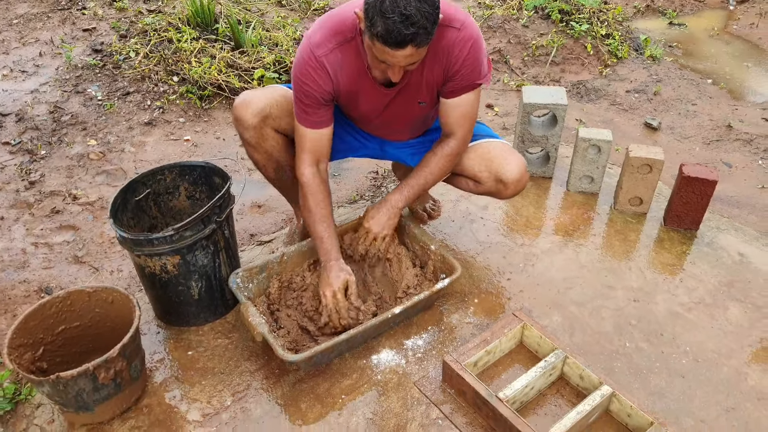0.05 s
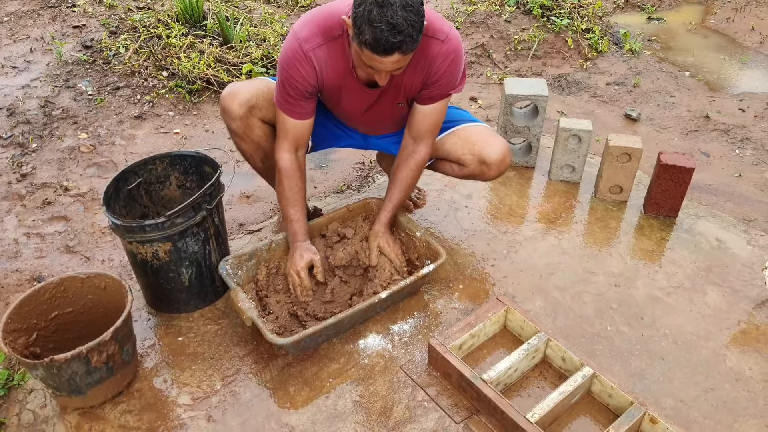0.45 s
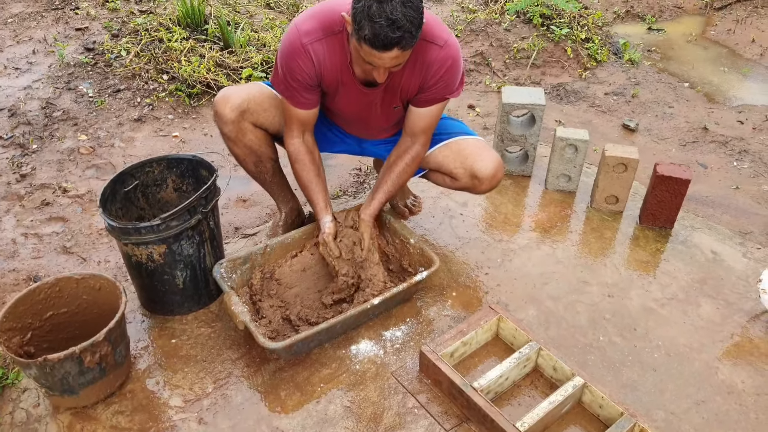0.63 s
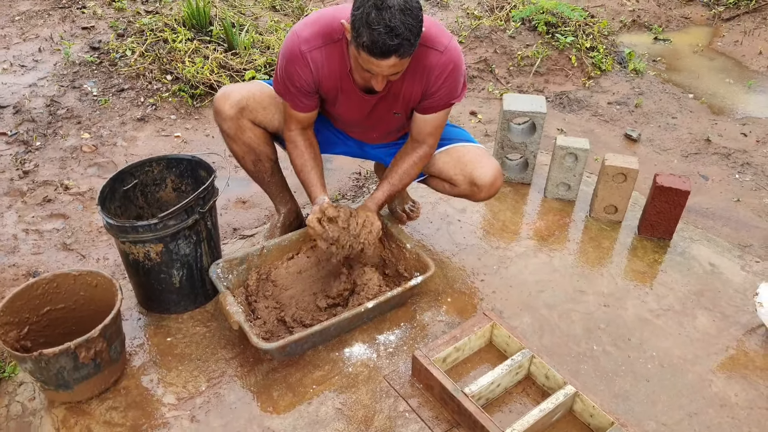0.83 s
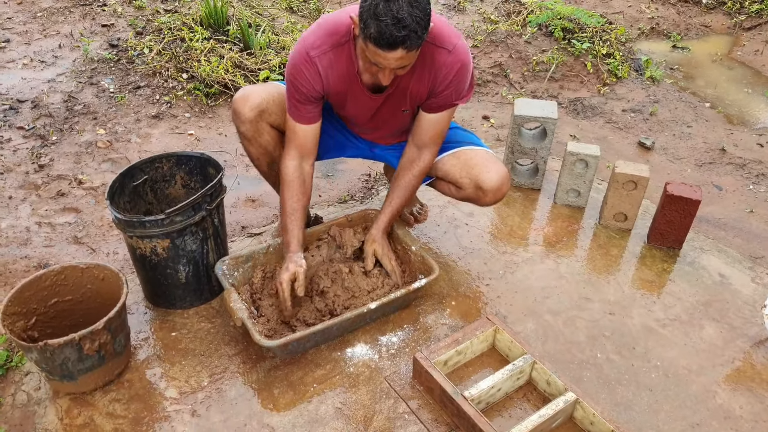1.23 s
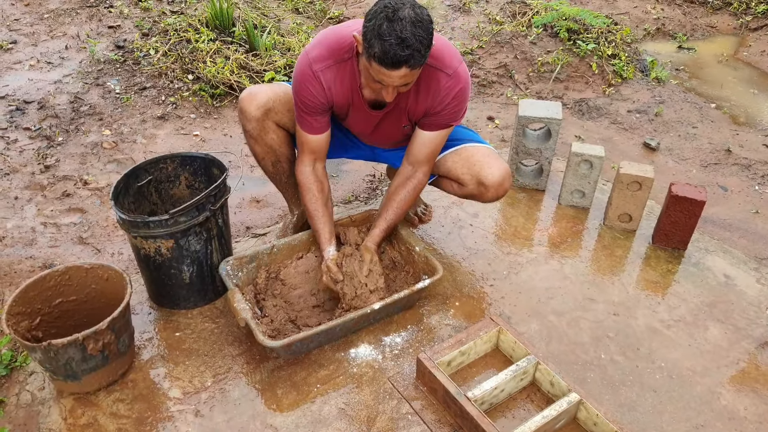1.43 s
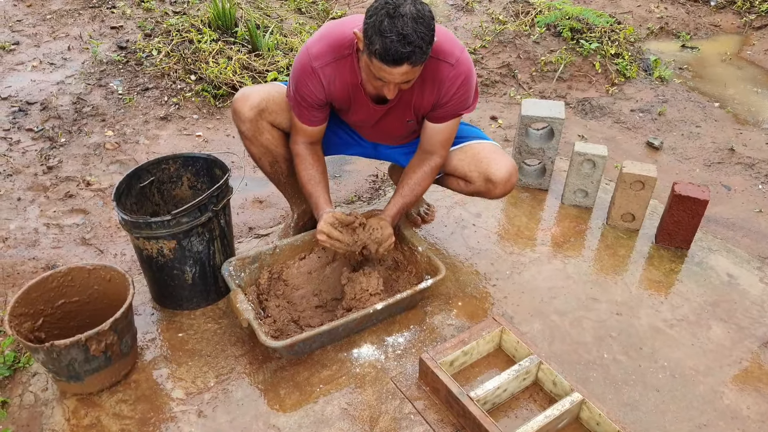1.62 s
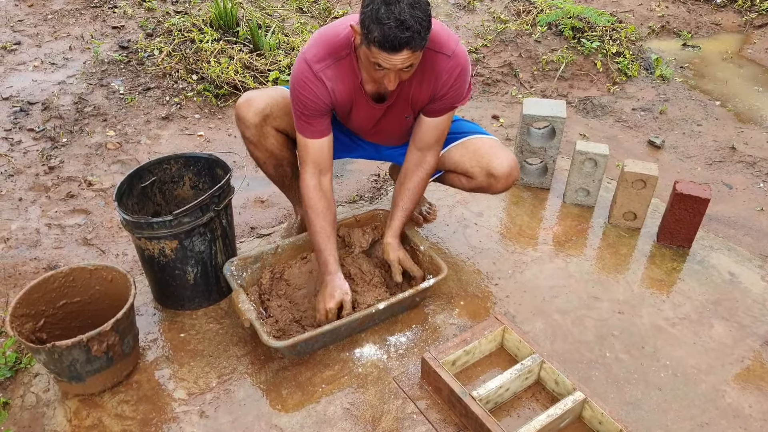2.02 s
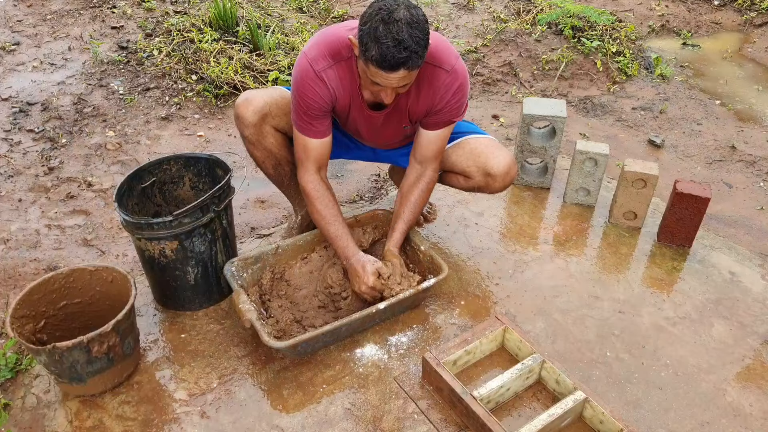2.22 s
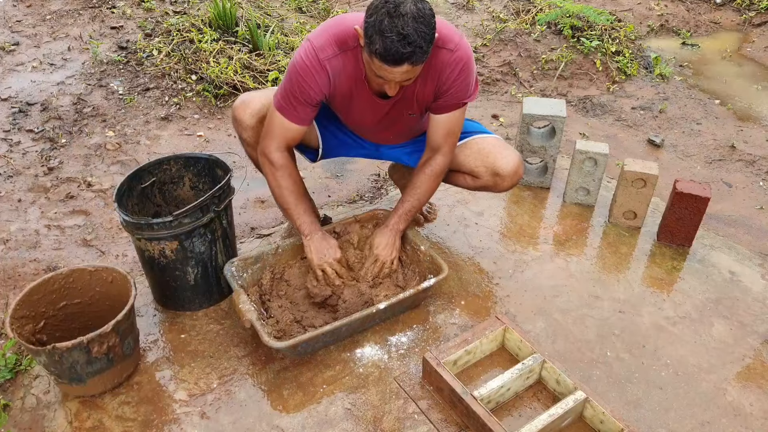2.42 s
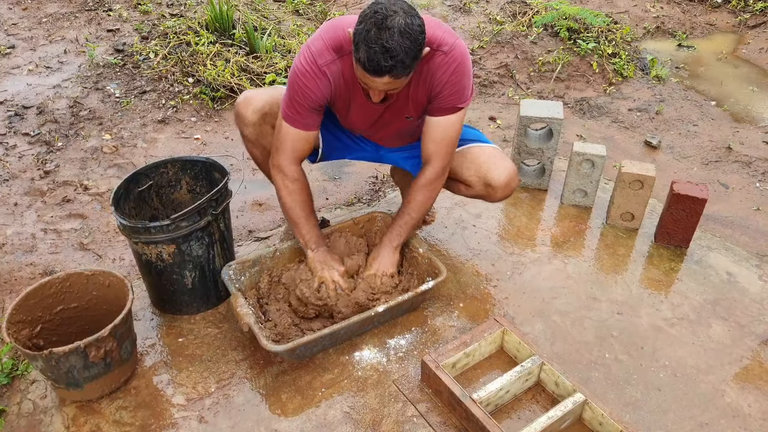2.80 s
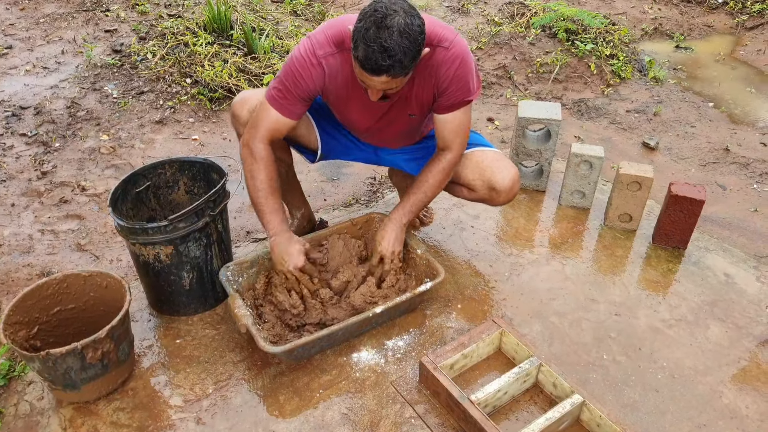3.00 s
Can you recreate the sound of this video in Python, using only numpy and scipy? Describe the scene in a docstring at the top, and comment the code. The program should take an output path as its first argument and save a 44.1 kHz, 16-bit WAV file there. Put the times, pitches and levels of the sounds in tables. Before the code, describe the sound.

Wet mud squelches as it is squeezed by hand outdoors, with one sharp slap.

```python
"""Hands knead wet clay in a plastic tub outdoors. Tiny films burst in a fizz, squeezed mud squelches in the
hollow between the fingers, trapped air spits out and wet contacts click. The clay thuds on the tub;
once a lump is slapped down and its cavity rings. Behind it, water patters steadily on wet ground,
light gusts buffet the microphone and the distance hisses faintly."""
import sys
import numpy as np
from scipy import signal
from scipy.fft import rfft, irfft, next_fast_len
from scipy.io import wavfile
from scipy.ndimage import uniform_filter1d

SR = 44100
rng = np.random.default_rng(int(sys.argv[2]) if len(sys.argv) > 2 else 0)


def bounce(signal):
    """Save signal as a 16-bit WAV file at the path given by the first command-line argument."""
    frames = np.transpose(np.atleast_2d(signal))
    limited = np.clip(frames, -1, 1)
    pcm = np.round(limited * 32767).astype(np.int16)
    wavfile.write(sys.argv[1], SR, pcm)


N = 138915

# distant hiss spectrum (frequency [Hz], gain [dB])
HISS_SPECTRUM = [(25, -34), (70, 7.5), (180, 1), (320, 10.5), (650, -1), (2800, -6), (6000, -32),
                 (16000, -24)]
# gusts (peak time [s], rise and fall width [s], relative level [dB])
GUST_EVENTS = [(0.616, 0.038, -44), (0.745, 0.089, -47.5), (0.813, 0.017, -43), (0.938, 0.027, -49),
               (1.502, 0.092, -52.5), (1.896, 0.032, -50), (2.079, 0.028, -44.5), (2.306, 0.017, -40.5),
               (2.461, 0.024, -45), (3.06, 0.035, -54)]
# buffeting spectrum (frequency [Hz], gain [dB])
GUST_SPECTRUM = [(20, -26), (35, -10), (55, 5.5), (85, 2.5), (130, -7.5), (250, -20.5), (1500, -71)]
# spectrum of splats and wet clicks (frequency [Hz], gain [dB])
WET_SPECTRUM = [(100, -14.5), (220, -13.5), (320, 7), (450, 5), (600, 1), (1500, 1.5), (2100, -2.5),
                (3600, -5), (5500, -12.5), (16000, -37)]
# slow swing of the patter (time [s], gain [dB])
PATTER_GAIN = [(0, 3), (.9, 1), (1.27, -0.5), (1.7, 1), (3.15, 2)]
# clay slapped or pressed on the tub (time [s], level [dB], decay [s])
THUD_EVENTS = [(0.219, -49, 0.046), (0.813, -43.5, 0.011), (1.095, -35.5, 0.0096), (2.3, -37, 0.0045)]
# thud spectrum (frequency [Hz], gain [dB])
THUD_SPECTRUM = [(35, -6), (85, 0.5), (200, -2), (400, -7.5), (850, -20), (5000, -64)]
# modes of the cavity under the slapped lump (frequency [Hz], level [dB])
CAVITY_MODES = [(851, -27.5), (1360, -31.5), (2380, -33), (2950, -35)]
# single wet clicks (time [s], relative level [dB], pitch [Hz])
CLICK_EVENTS = [(0.25, -30, 1640), (0.409, -30, 1460), (0.431, -31, 1600), (0.501, -28, 1280),
                (0.621, -23, 1350), (0.635, -24, 1450), (0.784, -31, 1400), (0.912, -30, 1580),
                (1.058, -25, 700), (1.204, -31.5, 1330), (1.273, -30, 1250), (1.308, -33, 1320),
                (1.396, -30, 2300), (1.457, -29, 800), (1.51, -30.5, 1390), (1.641, -30, 1140),
                (1.804, -28, 1240), (1.996, -31, 1630), (2.009, -31, 1150), (2.27, -32, 1500),
                (2.462, -28, 1310), (2.608, -28, 1790), (2.659, -29, 1520), (2.851, -22.5, 1000)]
# escaping air pockets, plus the hard crack of the lump slapped down at 1.094 s (time [s], level [dB], pitch
# [Hz], decay [s])
SPIT_EVENTS = [(.522, -37.5, 4480, .003), (.566, -39, 12300, 0.0027), (0.704, -40.5, 3130, 0.0059),
               (1.052, -40, 11000, .003), (1.084, -29, 2600, 0.0045), (1.0855, -29, 8000, 0.0018),
               (1.087, -35.5, 4700, 0.0082), (1.0941, -16, 12600, 0.00082), (1.314, -42.5, 4940, .004),
               (1.465, -36.5, 2670, 0.0034), (1.828, -37, 4500, 0.0034), (1.858, -36.5, 5000, 0.0033),
               (1.859, -34.5, 12100, 0.003), (2.252, -33, 13000, 0.0023), (2.2519, -30.5, 2900, 0.0043),
               (2.2539, -37, 5100, .002), (2.482, -31, 4640, 0.0018), (2.493, -45, 12800, 0.0035),
               (2.502, -34, 2550, 0.003), (2.557, -39, 4400, 0.0014), (2.811, -42, 12900, .004)]
# mud forced between fingers (peak time [s], rise [s], fall [s], relative level [dB], hollow pitch [Hz])
SQUELCH_EVENTS = [(.232, 0.031, 0.019, -47.5, 930), (.435, 0.0078, 0.091, -49.5, 1510),
                  (0.598, 0.011, 0.011, -38, 1430), (0.625, 0.012, 0.014, -40.5, 1360),
                  (.82, 0.019, 0.047, -51, 440), (1.063, 0.0047, 0.044, -45, 453),
                  (1.093, 0.0049, 0.0076, -39.5, 1320), (1.463, 0.0065, 0.011, -43.5, 1570),
                  (1.831, 0.015, 0.0069, -40, 820), (2.185, 0.042, 0.045, -48, 1290),
                  (2.335, 0.014, 0.019, -48, 750), (2.478, 0.018, 0.02, -42, 1250),
                  (2.609, 0.018, 0.011, -46, 1100), (2.792, 0.015, 0.015, -46, 1380),
                  (2.868, 0.016, 0.022, -45, 1520)]
# squelch crackle spectrum (frequency [Hz], gain [dB])
SQUELCH_SPECTRUM = [(150, 1), (350, 18.5), (800, 10), (1100, -7.5), (2800, -7), (3700, -4.5), (5000, -1),
                    (8000, -16), (16000, 1)]
# modes of the hollow between the fingers (pitch multiple [ratio], gain [dB])
HOLLOW_MODES = [(.58, -11), (1, -4), (1.95, -8.5)]
# fizz of sliding clay (time [s], level [dB])
FIZZ_LEVEL = [(0, -52), (.18, -48), (.24, -44.5), (.31, -51), (.39, -55.5), (0.429, -49), (.49, -53.5),
              (.56, -42), (.62, -46), (.67, -49.5), (.83, -47.5), (.88, -53), (1.01, -51.5), (1.05, -40),
              (1.07, -48), (1.096, -31), (1.12, -43.5), (1.23, -57.5), (1.41, -50), (1.475, -45.5),
              (1.51, -51), (1.79, -53), (1.83, -43.5), (1.87, -46.5), (1.91, -55), (2.05, -52.5),
              (2.16, -48.5), (2.25, -44), (2.31, -50), (2.45, -51.5), (2.475, -43.5), (2.54, -45),
              (2.6, -54), (2.745, -52.5), (2.765, -47), (2.9, -49.5), (3.15, -52)]
# fizz spectrum (frequency [Hz], gain [dB])
FIZZ_SPECTRUM = [(500, -5.5), (1500, 5), (2800, 4), (4000, 3), (8500, 3), (10000, 0), (12000, 5),
                 (14500, 1.5), (16000, 5)]
# stereo width (frequency [Hz], side gain [dB])
SIDE_GAIN = [(100, -4), (300, -12), (600, -6.5), (1300, -2), (4000, 0.5), (9000, -6.5), (13000, -10.5)]


def from_db(db):
    """Decibels to gain."""
    return 10 ** (np.asarray(db) / 20)


def unit_rms(x):
    """Scale to rms 1."""
    return x / np.sqrt(np.mean(x ** 2) + 1e-20)


def times_s():
    """Time of every sample."""
    return np.arange(N) / SR


def add(out, sound, time_s):
    """Mix in a short sound."""
    start = int(np.clip(time_s * SR, 0, N - 1))
    out[..., start:start + sound.shape[-1]] += sound[..., :N - start]


def flatten(x, window_s):
    """Hold the running rms at 1."""
    power = uniform_filter1d(x ** 2, max(int(window_s * SR), 3))
    return x / np.sqrt(np.abs(power) + 1e-12)


def bin_gains(spectrum, size):
    """FFT bin gains from (Hz, dB) points, interpolated in log frequency."""
    hz, db = np.transpose(spectrum)
    return from_db(np.interp(np.log(np.fft.rfftfreq(size, 1 / SR) + 1), np.log(hz), db))


def colour(x, spectrum):
    """Minimum-phase filter, unit power gain."""
    size = next_fast_len(N + 8192, True)
    cepstrum = irfft(np.log(unit_rms(bin_gains(spectrum, size))), size)
    cepstrum[1:size // 2] *= 2
    cepstrum[size // 2 + 1:] = 0
    return irfft(rfft(x, size) * np.exp(rfft(cepstrum)), size)[..., :N]


def resonate(x, hz, q):
    """Fixed resonance, peak gain 1."""
    w = 2 * np.pi * min(hz, .45 * SR) / SR
    damping = np.sin(w) / (2 * q)
    return signal.lfilter([damping, 0, -damping], [1 + damping, -2 * np.cos(w), 1 - damping], x + 1e-18)


def glide(x, hz, width_hz):
    """Resonance with per-sample pitch, rms 1."""
    carrier = np.exp(2j * np.pi * np.cumsum(hz) / SR)
    baseband = signal.lfilter([1], [1, -np.exp(-np.pi * width_hz / SR)], x / carrier + 1e-18)
    return unit_rms((carrier * baseband).real)


def swell(peak_s, rise_s, fall_s):
    """Asymmetric Gaussian envelope."""
    t = times_s() - peak_s
    return np.exp(-.5 * (t / np.where(t < 0, rise_s, fall_s)) ** 2)


def burst(lead_s, rise_s, decay_s):
    """Exponential rise and decay, peak at lead_s."""
    t = np.arange(SR // 8) / SR - lead_s
    return np.exp(-np.abs(t) / np.where(t < 0, rise_s, decay_s))


def grains(per_s, spread_db):
    """Random impulses of uneven size and sign."""
    sizes = from_db(spread_db * np.minimum(rng.exponential(1, N), 2.8))
    return sizes * rng.choice([-1, 1], N) * (rng.random(N) < per_s / SR)


def crackle(per_s, spread_db):
    """Dense clicks from random directions; mid/side, rms 1."""
    clicks = unit_rms(grains(per_s, spread_db))
    return np.array([clicks, np.roll(clicks * rng.choice([-1, 1], N), 2)])


def smack(hz, q, ring_db, decay_s, spray_db):
    """Wet contact: an impulse and a dying spray ring at one pitch; mid/side."""
    envelope = np.exp(-np.arange(SR // 30) / (decay_s * SR))
    contact = from_db(spray_db) * envelope * rng.standard_normal((2, len(envelope)))
    contact[:, 0] += [1, rng.uniform(-.62, 1)]
    return contact + from_db(ring_db) * resonate(contact, hz, q)


def left_right(mid, side):
    """Mid/side to left/right."""
    return np.array([mid + side, mid - side])


def distant_hiss(level_db=-59.5):
    """Steady outdoor noise; mid/side."""
    return from_db(level_db) * colour(rng.standard_normal((2, N)), HISS_SPECTRUM)


def wind(mid_db=-3, side_db=-1):
    """Low buffeting, separate at each microphone port; left/right."""
    power = sum((from_db(db) * swell(peak_s, width_s, width_s)) ** 2
                for peak_s, width_s, db in GUST_EVENTS)
    rumble = flatten(colour(rng.standard_normal((2, N)), GUST_SPECTRUM), window_s=.088)
    return left_right(*(rumble * np.sqrt(power) * from_db([[mid_db], [side_db]])))


def bubbles(per_s=170, pitches=20, cycles_to_minus_60_db=21.4):
    """Bubbles left by drops ring briefly; mid/side, rms 1."""
    q = cycles_to_minus_60_db * np.pi / np.log(1000)
    out = np.zeros((2, N))
    for hz in np.geomspace(380, 2400, pitches):
        ringing = resonate(grains(per_s / pitches, spread_db=2.5), hz, q)
        out += ringing / np.sqrt(hz) * np.array([[1], [rng.uniform(-1, 1)]])
    return unit_rms(out)


def splats(per_s=220, spread_db=5.6, centre_hz=1100, spread_octaves=1.6):
    """Drops hit wet ground, each at its own pitch; mid/side, rms 1."""
    out, time_s = np.zeros((2, N)), 0
    while time_s < N / SR:
        size, pitch = rng.uniform(-1.05, 1, 2)
        hz = centre_hz * 2 ** (spread_octaves * pitch)
        drop = smack(hz, q=6.1, ring_db=7.5, decay_s=.0028, spray_db=-11.5)
        add(out, from_db(spread_db * size) * drop, time_s)
        time_s += rng.exponential(1 / per_s)
    return unit_rms(colour(out, WET_SPECTRUM))


def water():
    """Patter of bubbles and splats, easing slightly midway; mid/side."""
    patter = from_db(-58) * bubbles() + from_db(-53.5) * splats()
    return patter * from_db(np.interp(times_s(), *np.transpose(PATTER_GAIN)))


def yard(x, echo_db=-17, decay_s=.016, gap_s=.002):
    """Add faint, short scatter from ground, buckets and blocks."""
    t = times_s()[:SR // 4]
    tail = rng.standard_normal((2, len(t))) * np.exp(-t / decay_s) * (t > gap_s)
    tail /= np.sqrt(np.sum(tail[0] ** 2))
    return x + from_db(echo_db) * signal.fftconvolve(x, tail, axes=1)[:, :N]


def thuds(lead_s=.02):
    """Dull blows of clay on the tub bottom; mid/side."""
    envelope = np.zeros(N)
    for time_s, db, decay_s in THUD_EVENTS:
        add(envelope, from_db(db) * burst(lead_s, rise_s=.0011, decay_s=decay_s), time_s - lead_s)
    return envelope * flatten(colour(rng.standard_normal((2, N)), THUD_SPECTRUM), window_s=.027)


def slap(time_s=1.0925, decay_s=.0046):
    """The landing lump traps a cavity that rings briefly; mid only."""
    t = np.maximum(times_s() - time_s, 0)
    modes = sum(from_db(db) * np.sin(2 * np.pi * hz * t) for hz, db in CAVITY_MODES)
    return np.array([modes * np.exp(-t / decay_s), np.zeros(N)])


def wet_clicks(gain_db=-2.8, lag_s=.0018):
    """Louder single smacks of water and mud; mid/side."""
    out = np.zeros((2, N))
    for time_s, db, hz in CLICK_EVENTS:
        click = smack(hz, q=3.5, ring_db=7, decay_s=.003, spray_db=-9.5)
        add(out, from_db(db + gain_db) * click, time_s + lag_s)
    return colour(out, WET_SPECTRUM)


def spits(q=15, climb_per_s=6, spray_db=-7, side_db=-6, lead_s=.01):
    """Air escapes a small opening: broad spray plus the shrinking pocket's rising ring; the slapped lump's hard
    crack is made the same way; mid/side."""
    out = np.zeros((2, N))
    for time_s, db, hz, decay_s in SPIT_EVENTS:
        envelope = burst(lead_s, rise_s=.22 * decay_s, decay_s=decay_s)
        pitch_hz = hz * (1 + climb_per_s * (times_s()[:len(envelope)] - lead_s))
        puff, jet = rng.standard_normal((2, 2, len(envelope)))
        tone = flatten(glide(puff, pitch_hz, width_hz=hz / q), window_s=.00058)
        spray = from_db(spray_db) * unit_rms(resonate(jet, hz, q=.36))
        add(out, from_db(db) * envelope * (tone + spray), time_s - lead_s)
    return out * from_db([[0], [side_db]])


def squelches(direct_db=-7.5):
    """Hard squeezes crackle and ring a hollow that changes size as the fingers close; mid/side."""
    pops = flatten(crackle(per_s=2000, spread_db=3.5), window_s=.006)
    effort = sum(from_db(db) * swell(peak_s, rise_s, fall_s)
                 for peak_s, rise_s, fall_s, db, _ in SQUELCH_EVENTS)
    peaks_s, *_, hollow_hz = np.transpose(SQUELCH_EVENTS)
    pitch_hz = np.exp(np.interp(times_s(), peaks_s, np.log(hollow_hz)))
    ringing = sum(from_db(db) * glide(pops, pitch_hz * ratio, width_hz=220) for ratio, db in HOLLOW_MODES)
    return from_db(direct_db) * colour(pops * effort, SQUELCH_SPECTRUM) + ringing * effort


def fizz(clump_db=2.7, clump_s=.003):
    """Tiny films burst in clumps as clay slides under the hands; mid/side."""
    flicker = unit_rms(uniform_filter1d(rng.standard_normal(N), int(clump_s * SR)))
    films = crackle(per_s=7000, spread_db=.5) * unit_rms(from_db(clump_db * flicker))
    return colour(films, FIZZ_SPECTRUM) * from_db(np.interp(times_s(), *np.transpose(FIZZ_LEVEL)))


def scene(balance_db=.3):
    """Clay and water in an open yard, with hiss and wind; left/right."""
    hiss, gusts = distant_hiss(), wind()
    clay = yard(fizz() + squelches() + slap() + thuds() + wet_clicks())
    escaping_air = left_right(*spits())
    mid, side = clay + hiss + water()
    side = irfft(rfft(side) * bin_gains(SIDE_GAIN, N), N)
    return (left_right(mid, side) + escaping_air) * from_db([[-balance_db], [balance_db]]) + gusts


def record(dry, cutoff_hz=15800):
    """Steep elliptic low-pass."""
    return signal.sosfilt(signal.ellip(12, .1, 80, cutoff_hz, fs=SR, output="sos"), dry)


dry = scene()
out = record(dry)
bounce(out)
```